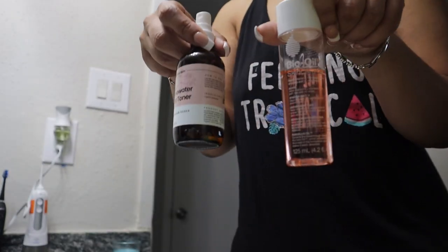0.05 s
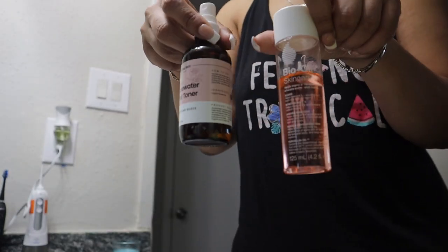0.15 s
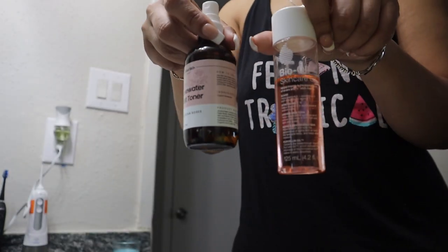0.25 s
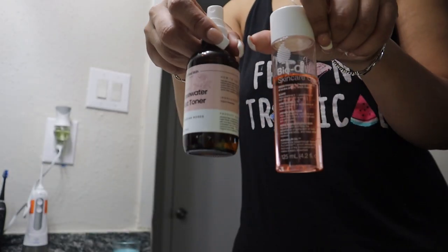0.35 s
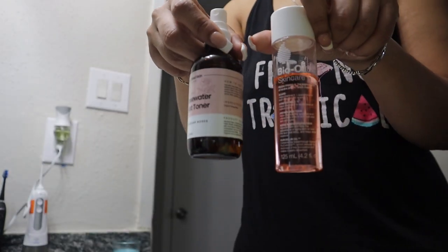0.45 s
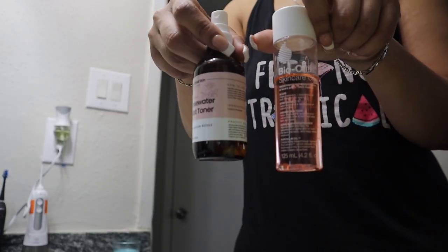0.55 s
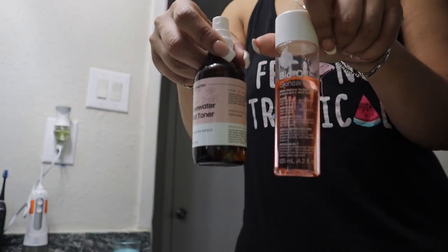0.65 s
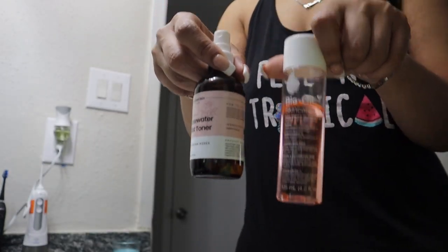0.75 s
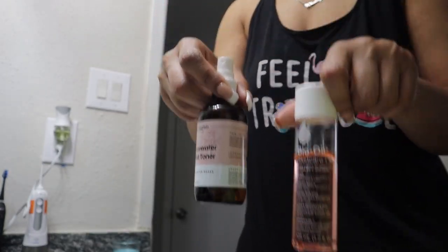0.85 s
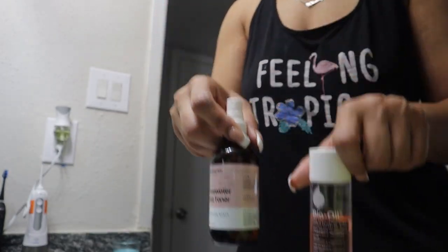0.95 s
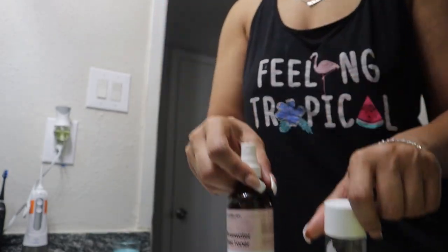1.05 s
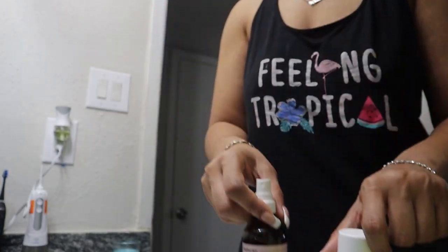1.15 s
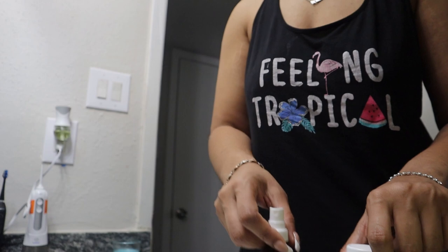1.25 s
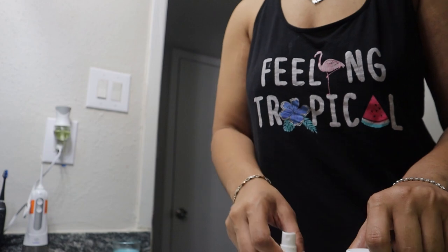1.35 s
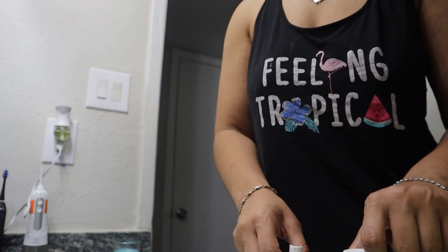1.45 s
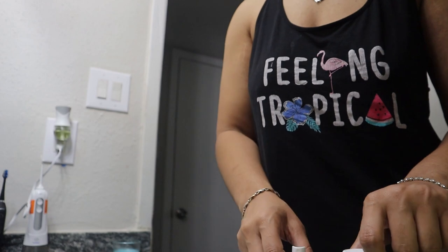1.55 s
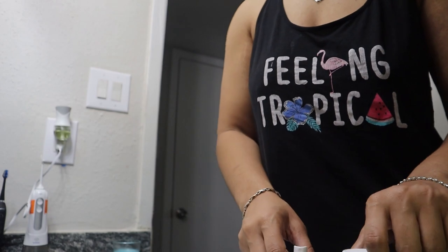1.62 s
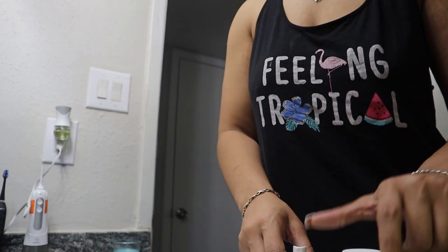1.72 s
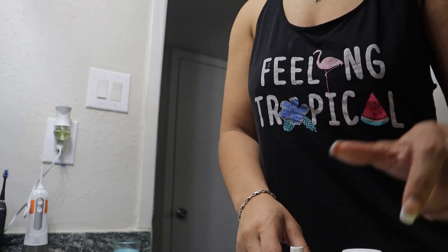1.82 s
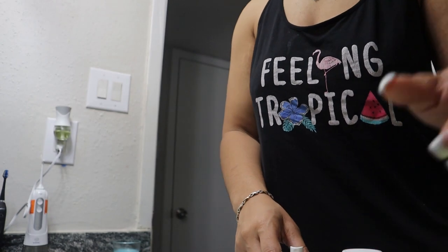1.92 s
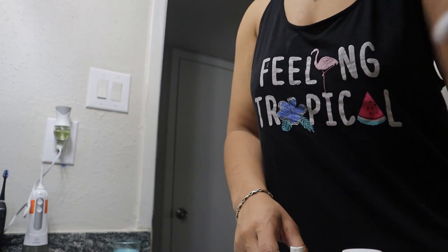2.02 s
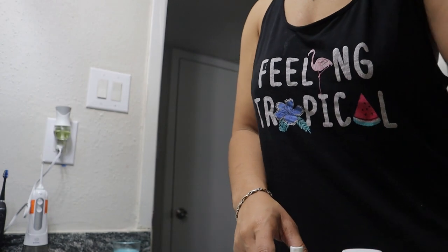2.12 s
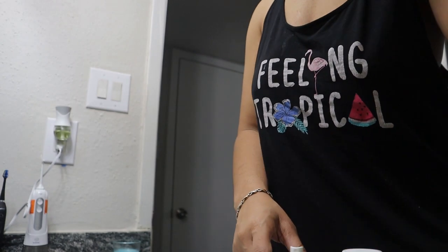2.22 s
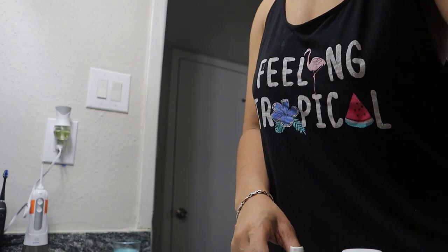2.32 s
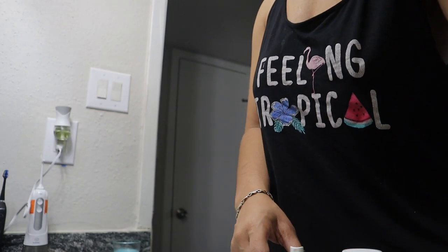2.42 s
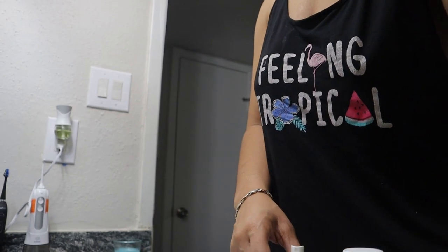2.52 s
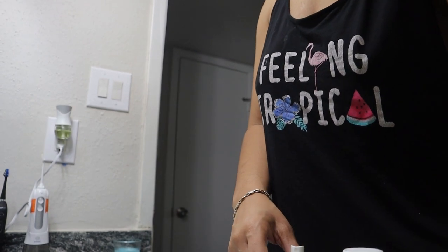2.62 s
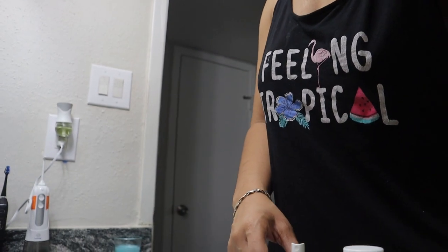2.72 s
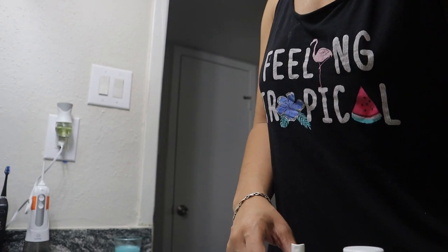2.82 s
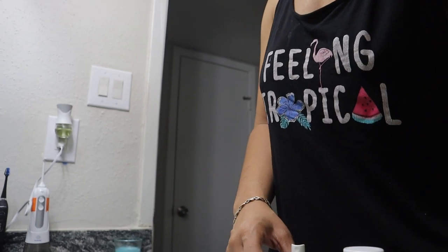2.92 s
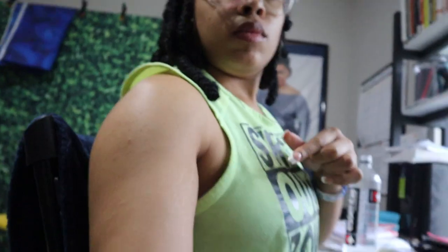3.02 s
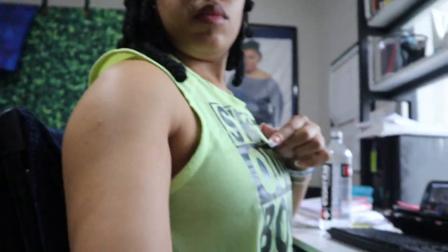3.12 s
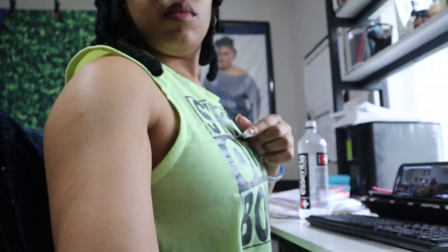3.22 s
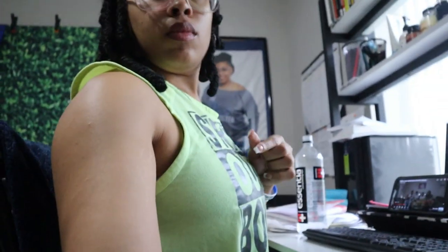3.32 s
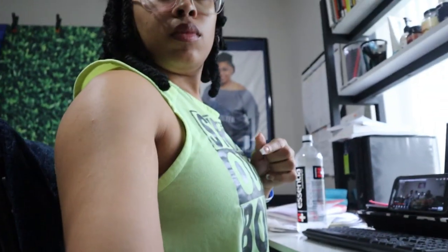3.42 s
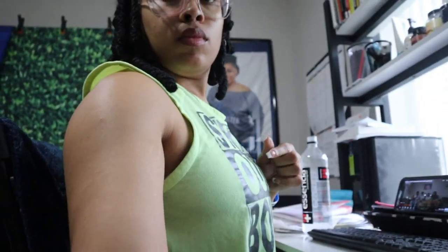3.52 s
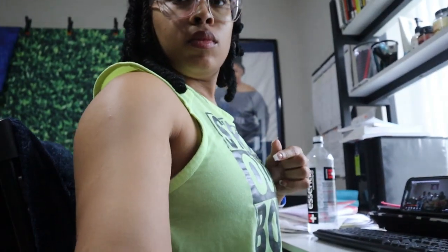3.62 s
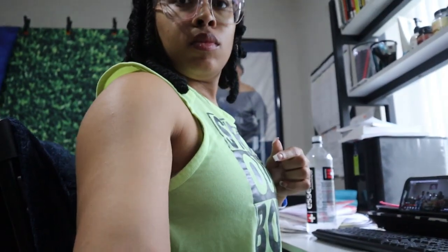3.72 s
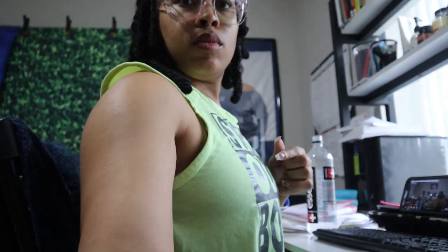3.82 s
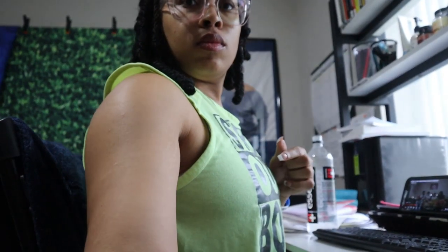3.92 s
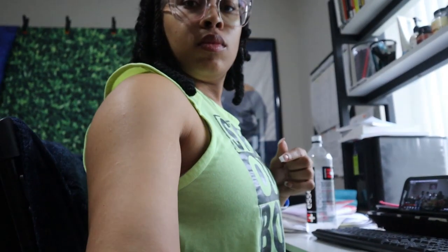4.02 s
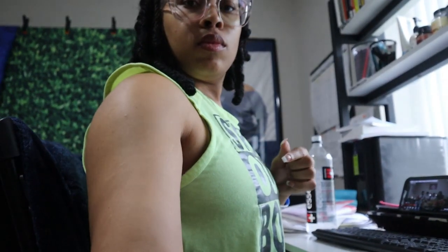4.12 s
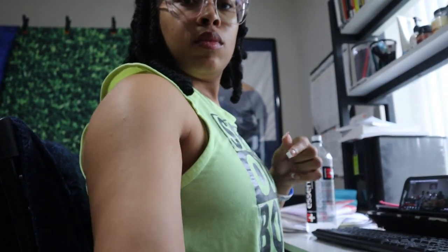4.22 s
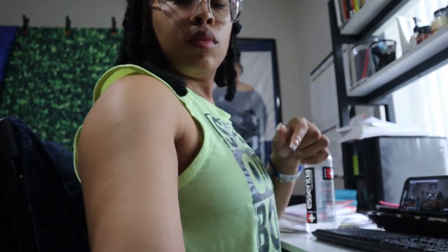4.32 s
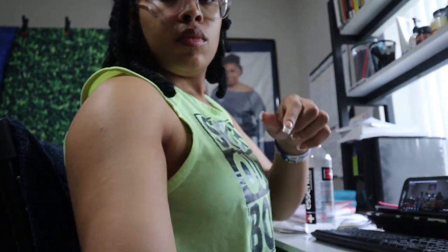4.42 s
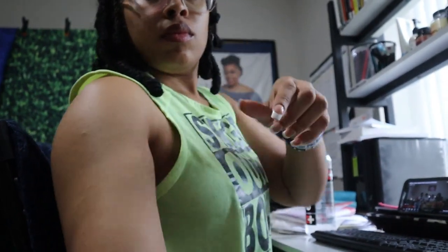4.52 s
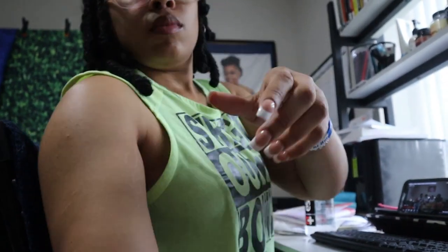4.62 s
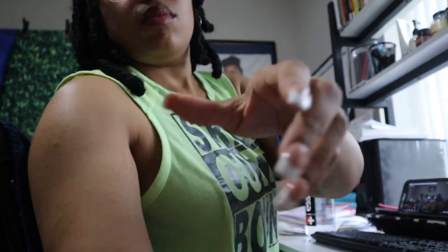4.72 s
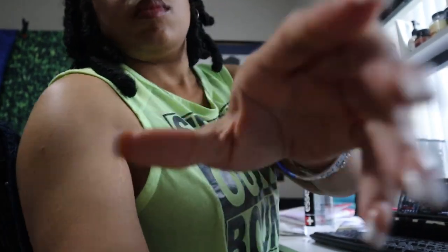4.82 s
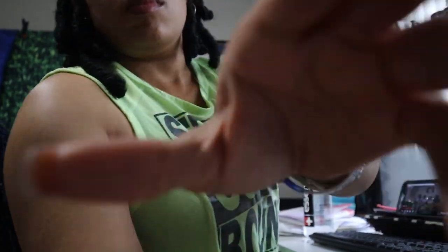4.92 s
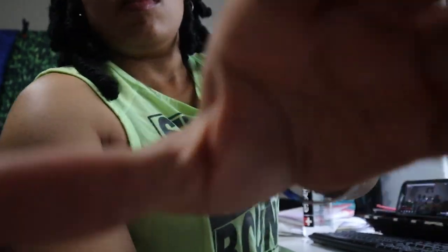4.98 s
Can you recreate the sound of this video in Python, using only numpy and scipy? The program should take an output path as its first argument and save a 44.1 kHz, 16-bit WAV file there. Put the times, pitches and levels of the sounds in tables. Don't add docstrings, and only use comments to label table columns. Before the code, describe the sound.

In a quiet tiled room with a low fan hum, a glass bottle knocks onto a stone counter, rocks briefly, and a plastic bottle lands louder. A cap clicks hollowly, a hand rubs away with nail ticks, and a latch snaps. After a tiny silent gap, a second room brings close button clicks, camera thumps, creaks, a hard snap and a late knock. Close stereo microphone on the camera.

```python
import sys
import numpy as np
from scipy import signal
from scipy.fft import rfft, irfft
from scipy.io import wavfile

SR = 44100
rng = np.random.default_rng(int(sys.argv[2]) if len(sys.argv) > 2 else 0)


def gain_from_db(level_db):
    decades = np.asarray(level_db, float) / 20
    return 10 ** decades


def log_audio(samples):
    frames = np.atleast_2d(samples).T
    limited = np.clip(frames, -1, 1)
    pcm = np.round(limited * 32767).astype(np.int16)
    wavfile.write(sys.argv[1], SR, pcm)


N = 222749

# (start [s], end [s])
ROOM_CHANGE_S = (2.973, 3.012)
# (at 1 kHz [dB], slope [dB per octave])
BUTTON_BODY = ([(400, -3, 0.048), (1057, 7, 0.032), (1310, 7, 0.028), (2110, 6, 0.0084)], [(150, -43.5),
               (250, -4.5), (790, -5), (1010, -3), (1350, -2), (1660, -14.5), (2260, -8.5), (3920, -25.5),
               (12000, -64), (15600, -61), (22000, -120)], [(400, 0.042), (2000, 0.095), (10000, 0.02)],
               (-8, 6.7))
# (time [s], fade [s], shell [dB], bright rub [dB], grip tilt [dB per octave])
SHELL_GRABS = [
    (3.368, 0.05, -28, -45.5, -12),
    (3.427, 0.13, -51, -49.5, 2),
    (3.54, 0.61, -57, -79, -3.5),
    (3.837, 0.2, -44, -85, -13),
    (3.948, 0.13, -37.5, -58, 1.5),
]
# (time [s], fade [s], shell [dB], bright rub [dB], grip tilt [dB per octave])
SHELL_CREEPS = [
    (3.479, 0.064, -49, -50, 3),
    (3.908, 0.044, -36.5, -82, -1.5),
    (4.057, 0.02, -40.5, -60, 0.5),
    (4.0, .06, -45, -68, -2.5),
    (4.21, .15, -55.5, -85, -4),
    (4.52, 0.27, -55.5, -85, 0.5),
]


def rms_one(x):
    return x / np.sqrt(np.mean(x ** 2) + 1e-20)


def at_hz(points, hz):
    points = np.array(points)
    return np.interp(np.log(hz), np.log(points[:, 0] + 1), points[:, 1])


def in_time(rows, column):
    rows = np.array(rows)
    level_db = np.interp(np.arange(N) / SR, rows[:, 0], rows[:, column], left=-200, right=-200)
    return gain_from_db(level_db)


def drift(rate):
    r = np.exp(-80 * np.pi * rate / SR)
    white = rng.standard_normal(N // 40 + 2002)
    slow = signal.lfilter([1], [1, -2 * r, r * r], white)[2000:]
    return np.interp(np.arange(N) / 40, np.arange(len(slow)), rms_one(slow - slow.mean()))


def coloured(white, spectrum):
    hz = np.maximum(np.fft.rfftfreq(N, 1 / SR), 1)
    return rms_one(irfft(rfft(white) * gain_from_db(at_hz(spectrum, hz)), N))


def causal_colour(x, spectrum_db):
    cepstrum = irfft(spectrum_db * np.log(10) / 20)
    half = cepstrum.shape[-1] // 2
    cepstrum[..., 1:half] *= 2
    cepstrum[..., half + 1:] = 0
    return irfft(rfft(x, 2 * half) * np.exp(rfft(cepstrum)))[..., :x.shape[-1]]


def ports(law, hz):
    level_db, per_octave_db = law
    return level_db + per_octave_db * np.log2(np.clip(hz, 40, 16000) / 1000)


def strokes(sudden, gradual, column):
    fade_db = 20
    t, level_db = np.arange(N) / SR, np.full(N, -200.)
    for rows, rise in ((sudden, 0.034), (gradual, 0.78)):
        for row in rows:
            late = (t - row[0]) / max(row[1], .005)
            level_db = np.maximum(level_db, row[column] - fade_db * np.maximum(late, -late / rise))
    return gain_from_db(level_db)


def slips(per_s, spread_db):
    grains = (rng.random((2, N)) < per_s / SR) * gain_from_db(spread_db * np.minimum(rng.exponential(1, (2, N)), 5))
    return rng.standard_normal((2, N)) * (0.6 + grains) * gain_from_db(1.0 * drift(58))


def blows(events, body, rise_s, crack_db=0.0, crack_t60=0.01, click_db=0.0):
    modes, spectrum, decay, side = body
    edges_hz = 22 * 2 ** np.arange(0, 9.9, .7)
    bands = [signal.butter(2, pair, "band", fs=SR, output="sos") for pair in zip(edges_hz, edges_hz[1:])]
    longest = np.clip(max(t60 for hz, t60 in decay), .05, .4)
    out, t = np.zeros((2, N)), np.arange(int(1.1 * longest * SR)) / SR
    grid_hz = np.maximum(np.fft.rfftfreq(2 ** 15, 1 / SR), 1)
    colour_db = at_hz(spectrum, grid_hz) + np.array([0 * grid_hz, ports(side, grid_hz)])
    for s, peak_db, ring_db, *pan_db in events:
        white = rng.standard_normal((2, 2, len(t)))
        luck_db = rng.standard_normal(len(modes))
        scatter, rings = 0, 0
        for k, (sos, hz) in enumerate(zip(bands, edges_hz * 2 ** .35)):
            t60 = max(at_hz(decay, hz), .004)
            tail = gain_from_db(-60 * t / t60) / np.sqrt(t60)
            crack = gain_from_db(crack_db + 6 - 60 * t / crack_t60)
            scatter = scatter + signal.sosfilt(sos, white[k % 2] * (tail + crack))
        scatter[:, round(2 * rise_s * SR)] -= gain_from_db(click_db)
        scatter = causal_colour(scatter, colour_db)
        for (hz, level_db, t60), strength_db in zip(modes, luck_db):
            phase = 2 * np.pi * hz * t + np.array([[0], [np.pi / 2]])
            dying = gain_from_db(level_db + strength_db - 60 * t / np.clip(t60, .004, .3))
            rings = rings + gain_from_db([[0], [ports(side, hz)]]) * dying * np.sin(phase)
        mid, diff = scatter / np.abs(scatter[0]).max() + gain_from_db(ring_db) * rings / np.abs(rings[0]).max()
        diff = diff + mid * np.tanh(sum(pan_db) * np.log(10) / 40)
        hit = np.array([mid, diff]) * (1 - np.exp(-t / rise_s))
        hit = hit / np.abs(hit[0]).max() * gain_from_db(peak_db)
        at = round(s * SR)
        out[:, at:at + len(t)] += hit[:, :N - at]
    return out


def room_tone():
    # sum (frequency [Hz], density [dB per Hz]), its level [dB], then the same of the difference
    tiled_noise = ([(15, -37), (25, -9), (91, -4), (148, -11.5), (389, -23), (1080, -26.5), (10600, -49),
                   (15500, -69)], -47, [(15, -49), (25, -34), (114, -13.5), (263, -7.5), (863, -9),
                   (6560, -25), (14000, -41.5), (16000, -33)], -50.5)
    office_noise = ([(15, -40), (25, 0), (140, -3.5), (305, -13.5), (582, -18), (3930, -33.5),
                    (11200, -45.5), (15500, -62)], -46.5, [(15, -56), (25, -30), (141, -5), (373, -2),
                    (775, -5.5), (1330, -7), (10700, -27.5), (16000, -49)], -50.5)
    # (frequency [Hz], tiled room rms [dB], second room rms [dB])
    fan_partials = [
        (122.7, -48, -53),
        (231, -64.5, -60.5),
        (359, -60, -62.5),
    ]
    t = np.arange(N) / SR
    second, out = t > np.mean(ROOM_CHANGE_S), np.zeros((2, N))
    for (mid, mid_db, side, side_db), on in ((tiled_noise, ~second), (office_noise, second)):
        white = rng.standard_normal((2, N))
        out += on * np.array([gain_from_db(mid_db) * coloured(white[0], mid), gain_from_db(side_db) * coloured(white[1], side)])
    for hz, tiled_db, office_db in fan_partials:
        wobble = np.cumsum(0.97 * drift(6.7)) / SR
        level = gain_from_db(np.where(second, office_db, tiled_db) + 0.5 * drift(5.0))
        out += np.sqrt(2) * level * np.sin(2 * np.pi * (hz * t + wobble)) * gain_from_db([[0], [-25.0]])
    return out


def sway():
    # (time [s], rumble level [dB])
    rumble = [
        (3.01, -61.5),
        (3.05, -43.5),
        (3.49, -59.5),
        (3.58, -36),
        (3.69, -40.5),
        (4.45, -49),
        (4.67, -51),
        (4.88, -44),
        (5.05, -43),
    ]
    low = signal.sosfilt(signal.butter(2, [34, 95], "band", fs=SR, output="sos"), rng.standard_normal(N))
    lumpy = rms_one(low * gain_from_db(3.0 * drift(2.7)))
    return lumpy * in_time(rumble, 1) * gain_from_db([[-3.0], [-35.0]])


def sliding():
    # (frequency [Hz], density [dB per Hz])
    rub_spectrum = [(180, 4), (300, 2.5), (437, -5.5), (658, 1.5), (1190, 0), (1270, -2.5), (2210, 1.5),
                    (8740, -24.5), (10800, -14.5), (13400, -30), (14400, -82)]
    # (frequency [Hz], difference minus sum [dB])
    rub_side = [(60, -22), (180, -19), (550, -23), (1650, -7), (4970, 10), (15000, 10)]
    # (time [s], fade [s], dull rub [dB], bright rub [dB])
    catches = [
        (2.012, 0.33, -40, -47),
        (2.077, 0.13, -35, -38),
        (2.261, 1, -46.5, -51),
        (2.553, 0.033, -39.5, -49.5),
        (4.474, 0.73, -61, -73),
        (4.923, 0.12, -46, -55),
    ]
    # (time [s], fade [s], dull rub [dB], bright rub [dB])
    sweeps = [
        (2.11, 0.11, -38, -39),
        (2.145, 0.075, -34, -39.5),
        (2.175, .05, -43, -44.5),
        (2.05, 0.05, -45, -54),
        (2.425, 0.29, -46.5, -50.5),
        (2.69, 0.18, -49, -55),
        (4.211, 0.43, -60.5, -97.5),
        (4.85, 0.55, -54.5, -63.5),
        (5.03, .2, -58, -64),
    ]
    split_hz = 4180
    white = slips(per_s=1300, spread_db=2.5)
    side = [(hz, db + at_hz(rub_side, hz)) for hz, db in rub_spectrum]
    dull = (2, "low", -10.5, catches, sweeps)
    bright = (3, "high", 3.0, catches + SHELL_GRABS, sweeps + SHELL_CREEPS)
    out = 0
    for column, kind, side_db, sudden, gradual in (dull, bright):
        sos = signal.butter(4, split_hz, kind, fs=SR, output="sos")
        pair = [rms_one(signal.sosfilt(sos, coloured(w, shape))) for w, shape in zip(white, (rub_spectrum, side))]
        out = out + np.array(pair) * gain_from_db([[0], [side_db]]) * strokes(sudden, gradual, column)
    return out


def creeping():
    # (frequency [Hz], width [Hz], level [dB])
    resonances = [(535, 410, -4.5), (1230, 200, 0.5), (2370, 690, 4), (2880, 700, -1), (4030, 3400, -8.5)]
    white, out = slips(per_s=360, spread_db=5.0), 0
    points = np.array(sorted(SHELL_GRABS + SHELL_CREEPS))
    tilt = np.interp(np.arange(N) / SR, points[:, 0], points[:, 4])
    for hz, width_hz, level_db in resonances:
        sos = signal.butter(2, [hz - width_hz / 2, hz + width_hz / 2], "band", fs=SR, output="sos")
        gain = gain_from_db(level_db + tilt * np.log2(hz / 1500) + 3.8 * drift(13.6))
        out = out + rms_one(signal.sosfilt(sos, white)) * gain * gain_from_db([[0], [ports(BUTTON_BODY[3], hz)]])
    return out / np.sqrt(len(resonances)) * strokes(SHELL_GRABS, SHELL_CREEPS, 2)


def nail_ticks():
    # (time [s], peak [dB], left minus right [dB])
    ticks = [(2.014, -37, -6), (2.056, -26.5, -4), (2.075, -22, -10), (2.185, -40, 3), (2.259, -40.5, -5),
             (2.442, -34.5, -8), (2.474, -43, -2), (2.552, -38.5, -19.5), (2.617, -33, 1), (2.70, -46.5, 1),
             (3.526, -42.5, -6)]
    # ([dB], [dB per octave])
    tick_body = ([(10750, 13, 0.0064), (5300, 3, .012)], [(1500, -11), (3000, 1.5), (7000, -12), (10500, 1),
                 (13500, -9), (15500, -35)], [(2000, 0.027), (10000, 0.0053)], (-11.5, 4.9))
    ring_db = -25
    return blows([(s, db, ring_db, pan) for s, db, pan in ticks], tick_body, rise_s=0.0008)


def shell_creaks():
    # (time [s], peak [dB], ring share [dB], left minus right [dB])
    creaks = [(3.391, -31, -7, 2), (3.435, -37, 7, 0), (3.441, -37, 3, 0), (3.454, -33, -5, 2),
              (3.464, -31, -8, 2), (3.474, -40, 2, 0), (3.487, -47, 1, 0), (3.497, -49, 1, 8),
              (3.9, -47, 1, 0), (4.002, -58, -5, 0), (4.049, -44.5, -13, 0)]
    # ([dB], [dB per octave])
    seam_body = ([(2420, -8, 0.027), (4240, -3, .04), (4770, -4, 0.045), (6000, -7, .03)], [(600, -17),
                 (1500, -6), (2300, 0), (3300, -21), (4500, -10), (5800, -20), (9000, -16), (15000, -44)],
                 [(1000, 0.037), (5000, 0.028), (10000, .01)], (-11, 5))
    return blows(creaks, seam_body, rise_s=0.00067)


def soft_knocks():
    # (time [s], peak [dB], ring share [dB])
    knocks = [
        (1.729, -30.5, 3),
        (1.76, -28, 16),
        (4.354, -33, -8),
        (4.366, -38, -16),
        (4.907, -7.5, 4),
        (5.003, -31.5, 4),
    ]
    # ([dB], [dB per octave])
    knock_body = ([(262, 4.5, 0.11), (320.4, -7, 0.2), (367, 1.5, 0.16), (767, -13.5, 0.058)], [(50, -49),
                  (100, -30), (180, -7), (260, 3), (400, -8), (650, -5), (900, -14.5), (1200, -28.5),
                  (2000, -32), (7000, -66), (11000, -82)], [(100, 0.91), (400, 0.12), (3000, 0.24)],
                  (-18, 7.5))
    return blows(knocks, knock_body, rise_s=0.0011, click_db=34.5)


def camera_thumps():
    # (time [s], peak [dB], ring share [dB])
    thumps = [
        (3.36, -12, 10),
        (3.383, -18, -4),
        (3.421, -14.5, 3),
        (3.505, -16.5, 6.5),
    ]
    bumps = [
        (4.072, -20.5, -1),
        (4.083, -34, -9),
    ]
    # ([dB], [dB per octave])
    thump_body = ([(56, 4.5, 0.067), (106, 2, 0.063), (232, 4.5, 0.054), (313, -10, 0.17)], [(22, -32),
                  (40, -5), (227, 3), (437, -8.5), (595, -13), (1170, -21), (1310, -20.5), (3000, -40),
                  (3900, -64), (6600, -120)], [(40, 0.14), (300, 0.71), (2000, 0.25)], (-15, 1.8))
    bump_body = ([(115, 3.5, 0.07), (251.6, -0.5, 0.091)], [(18, -21), (30, 6), (142, -3), (684, -23),
                 (949, -58), (1210, -33), (1500, -35), (1950, -66), (3300, -120)], [(40, 0.07),
                 (300, 0.029), (1000, 0.062)], (-7, 4))
    return (blows(thumps, thump_body, rise_s=0.0028, crack_db=14.0, crack_t60=0.063, click_db=39.0)
            + blows(bumps, bump_body, rise_s=0.00144, click_db=45.0))


def shell_jolts():
    # (time [s], peak [dB], ring share [dB], left minus right [dB])
    jolts = [
        (3.3655, -15.5, 0, 0.92),
        (3.377, -20, 0, -0.6),
    ]
    # ([dB], [dB per octave])
    jolt_body = ([(1008, 2, 0.06), (1480, -3, 0.013), (2360, -3, 0.015), (660, -10, 0.026),
                 (3300, -11, 0.014), (4500, -20, 0.019)], [(60, 3), (200, 26), (900, -8.5), (1800, -1),
                 (2800, -17), (4700, -18.5), (10800, -41.5), (15500, -66)], [(200, 0.04), (2000, 0.029),
                 (10000, 0.0089)], (-9.5, 6.2))
    return blows(jolts, jolt_body, rise_s=0.0002, crack_db=24.0, crack_t60=0.0075, click_db=32.0)


def button_presses():
    # (time [s], peak [dB], ring share [dB], left minus right [dB])
    presses = [(2.801, -28.5, 0, -1.0), (2.861, -33.5, -10, -6.5), (2.879, -36, -18, -1.0),
               (3.081, -25.5, -10, -1), (3.176, -23.5, -14, -3.5), (3.391, -24, -3, -3),
               (3.466, -25.5, -19, -5), (3.584, -36, 14, -9), (3.638, -32.5, -14, -2.0),
               (3.699, -39, -28, -10), (3.868, -27.5, 16, -8), (3.909, -30.5, -16, -4),
               (4.758, -21, 14, -1.5), (4.806, -36, -4, 1), (4.89, -25, 5, -1)]
    return blows(presses, BUTTON_BODY, rise_s=0.00072, crack_db=11.0, click_db=29.0)


def latch_click():
    # (time [s], peak [dB], ring share [dB], left minus right [dB])
    releases = [
        (2.847, -8.5, 0, -8.5),
    ]
    # ([dB], [dB per octave])
    latch_body = ([(930, 5, 0.036), (1080, 17.5, 0.02), (1210, -5, 0.021), (1940, 14, 0.024),
                  (2560, -7, 0.043)], [(180, -83), (300, -42.5), (1290, 6), (1650, -26), (1940, -8),
                  (2250, -28), (2650, -15.5), (6000, -23), (12000, -37.5), (15000, -56)], [(400, 0.05),
                  (2000, 0.1), (10000, 0.06)], (-6.5, 4.6))
    return blows(releases, latch_body, rise_s=0.00035, crack_db=21.0, crack_t60=0.007, click_db=43.5)


def shell_snap():
    # (time [s], peak [dB], ring share [dB], left minus right [dB])
    snaps = [
        (3.9379, -9.5, 3.4, -0.6),
    ]
    # (time [s], peak [dB], ring share [dB])
    snap_returns = [
        (3.9395, -13.5, 2.3),
        (3.943, -26, 3.4),
    ]
    # ([dB], [dB per octave])
    snap_body = ([(1374, -1.5, 0.025), (1840, -0.5, 0.019), (2264, 3.5, 0.027), (2550, 1, 0.02),
                 (2940, 0.5, 0.017), (4330, -13, 0.012)], [(60, -18), (200, 0), (800, -9), (1800, -18.5),
                 (2800, -8), (3600, -12), (5000, -13.5), (5500, -14), (10800, -17.5), (15500, -39)],
                 [(200, 0.064), (2000, 0.11), (10000, 0.01)], (-8.5, 4.7))
    return (blows(snaps, snap_body, rise_s=0.00007, crack_db=24.5, crack_t60=0.0047, click_db=42.5)
            + blows(snap_returns, snap_body, rise_s=0.0001, crack_db=13.0, crack_t60=0.006, click_db=40.0))


def cap_clicks():
    # (time [s], peak [dB], ring share [dB])
    clicks = [
        (1.880, -20.5, 7),
        (1.884, -16.5, 4),
        (1.887, -9.5, 9.5),
        (1.896, -12, 7.5),
        (1.905, -28.5, 16),
    ]
    # ([dB], [dB per octave])
    cap_body = ([(305, -4.5, 0.052), (490, -3.5, 0.22), (734, -3, 0.24), (821, -2, 0.13), (1151, -7, 0.18),
                (1420, -17, 0.18), (1670, -19.5, 0.24), (1920, -5.5, 0.14), (2333, -10, 0.05),
                (2840, -18, 0.075), (4304, -33.5, .4)], [(100, -27), (180, -11.5), (310, -2), (520, -16),
                (740, -1), (1100, -14.5), (1900, -13.5), (3000, -23), (4000, -41), (6000, -50),
                (12000, -72)], [(200, 0.14), (800, 0.2), (2500, 0.23), (10000, 0.077)], (-16.5, 5))
    return blows(clicks, cap_body, rise_s=0.00062)


def plastic_bottle():
    # (time [s], peak [dB], ring share [dB], left minus right [dB])
    landing = [
        (1.5712, 0.24, 2.4, 0.27),
    ]
    # ([dB], [dB per octave])
    plastic_body = ([(73.4, -0.5, 0.4), (254, 3.5, 0.15), (331, 19, 0.05), (372.5, 2, 0.23),
                    (581, 2.5, 0.3), (639, 3.5, 0.24), (752, 9, 0.23), (830, -0.5, 0.39), (987, 1.5, 0.24),
                    (1390, -0.5, 0.24), (1472, -3, 0.36), (1705, -2, 0.23), (1990, 0, 0.16),
                    (4280, -27, 0.42)], [(35, -43), (70, -25), (160, -9), (300, -1.5), (500, -9), (750, -2),
                    (1150, -11.5), (1450, -9), (2400, -13), (2900, -19.5), (3600, -38), (7000, -51.5),
                    (14000, -59.5)], [(60, 0.17), (300, 0.27), (2000, 0.29), (10000, 0.087)], (-16.5, 5.2))
    return blows(landing, plastic_body, rise_s=0.00054, crack_db=6.0, crack_t60=0.017)


def glass_bottle():
    # (time [s], peak [dB], ring share [dB], left minus right [dB])
    landings = [
        (1.389, -6.5, 0.5, -0.5),
        (1.415, -17.5, -3, 0.5),
    ]
    # (time [s], peak [dB], ring share [dB])
    glass_returns = [
        (1.43, -21.5, -0.5),
        (1.445, -24.5, 0),
        (1.462, -31.5, 0.5),
    ]
    # ([dB], [dB per octave])
    glass_body = ([(78.7, -3.5, 1.0), (237, 5.5, 0.15), (308, 4.5, 0.17), (488.6, -9.5, 0.23),
                  (1675, -7, 0.082), (2137, -15.5, 0.19), (2439, -18, 0.25), (3930, -14, 0.18),
                  (836, -12.5, 0.14)], [(40, -29), (75, -6), (140, 1), (260, 9), (480, -2), (700, -29),
                  (1250, -21.5), (1650, -18.5), (2400, -15.5), (3300, -29), (4020, -13), (4600, -32.5),
                  (14000, -61)], [(60, -0.5), (300, 0.8), (2000, 0.3), (10000, 0.1)], (-17, 5.5))
    return (blows(landings, glass_body, rise_s=0.0013, crack_db=10.0, crack_t60=0.023, click_db=32.0)
            + blows(glass_returns, glass_body, rise_s=0.0018, click_db=39.5))


def scene():
    background = room_tone() + sway()
    friction = sliding() + creeping() + shell_creaks()
    hands = nail_ticks() + soft_knocks()
    camera = camera_thumps() + shell_jolts() + button_presses() + latch_click() + shell_snap()
    bottles = cap_clicks() + plastic_bottle() + glass_bottle()
    mid, side = background + friction + hands + camera + bottles
    return np.array([mid + side, mid - side])


def top_cut(x):
    return signal.sosfilt(signal.butter(12, 16100, fs=SR, output="sos"), x)


def record(dry):
    t = np.arange(N) / SR
    start_s, end_s = ROOM_CHANGE_S
    gate = np.clip(np.maximum(start_s - t, t - end_s) / 0.0016, 0, 1)
    heard = signal.sosfilt(signal.butter(2, 27, "high", fs=SR, output="sos"), dry)
    return top_cut(np.clip(heard * gate, -1, 1))


dry = scene()
out = record(dry)
log_audio(out)
```